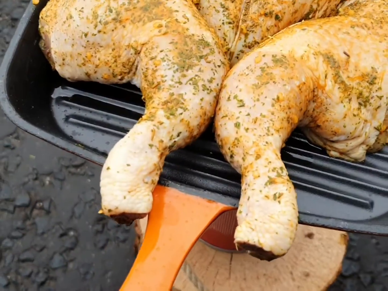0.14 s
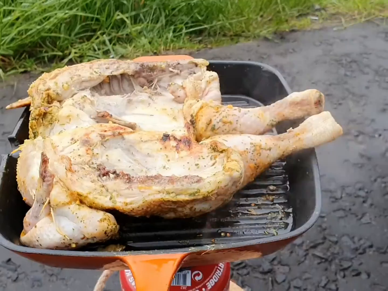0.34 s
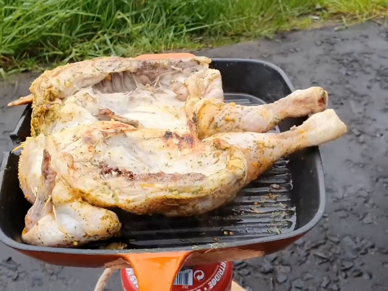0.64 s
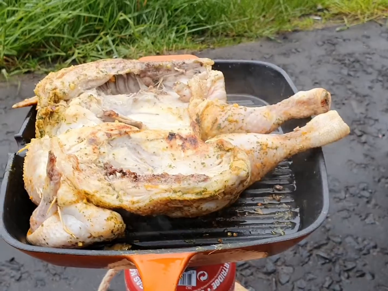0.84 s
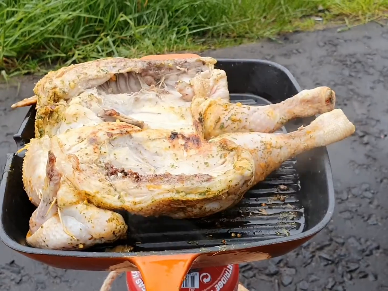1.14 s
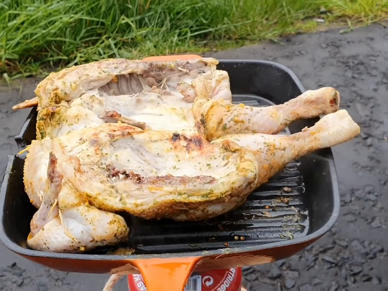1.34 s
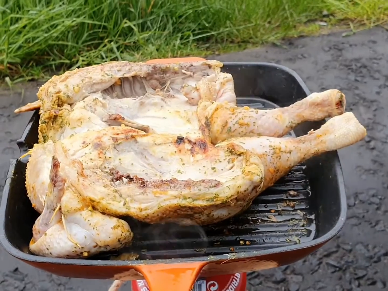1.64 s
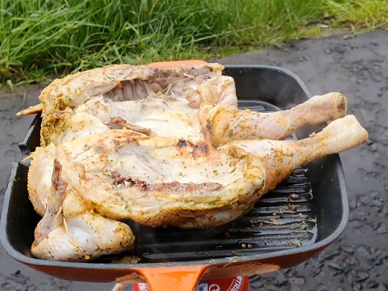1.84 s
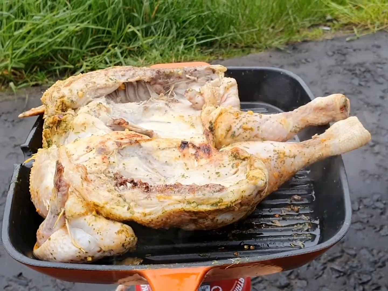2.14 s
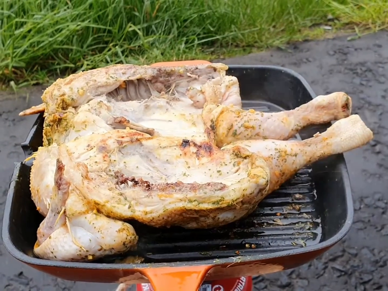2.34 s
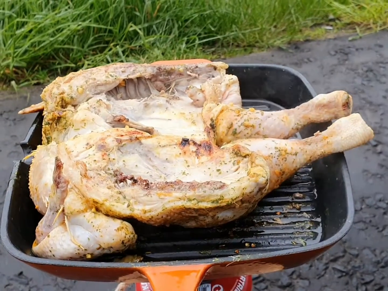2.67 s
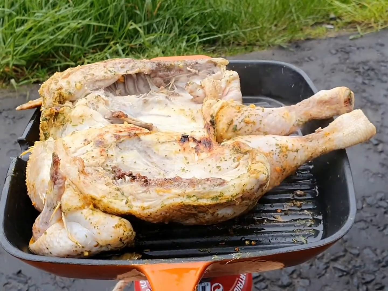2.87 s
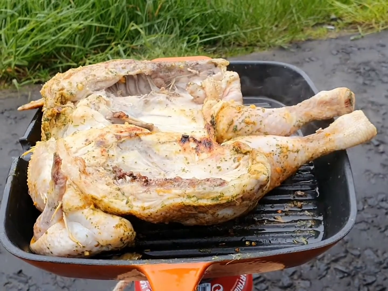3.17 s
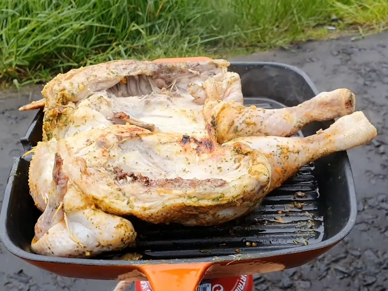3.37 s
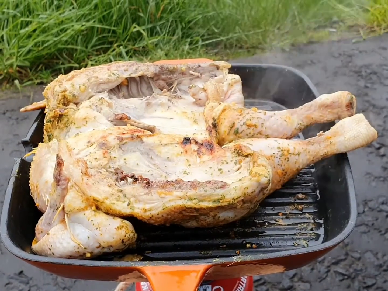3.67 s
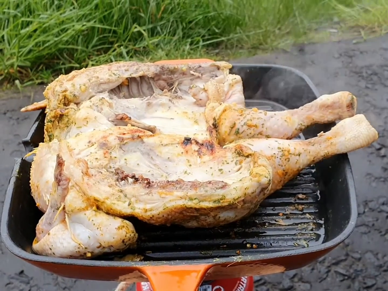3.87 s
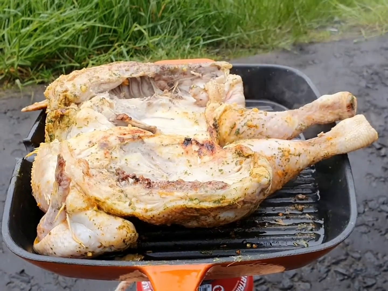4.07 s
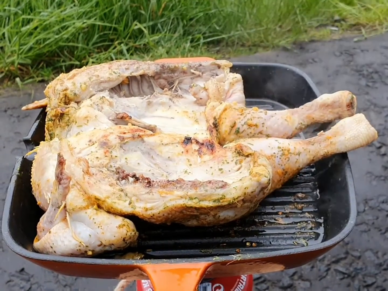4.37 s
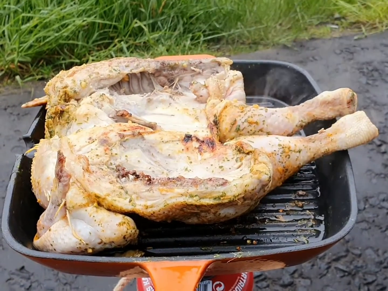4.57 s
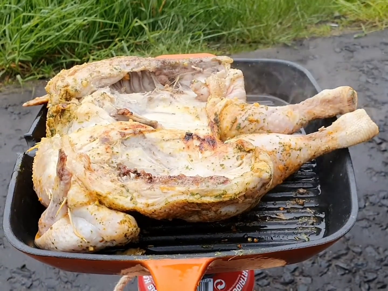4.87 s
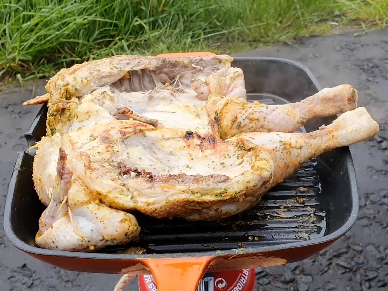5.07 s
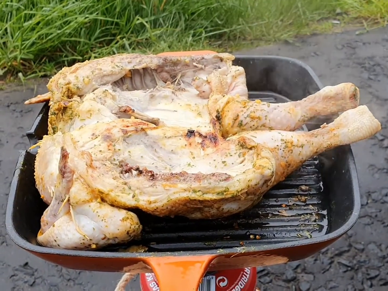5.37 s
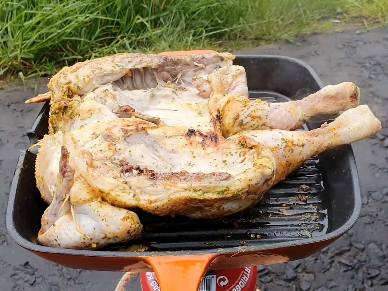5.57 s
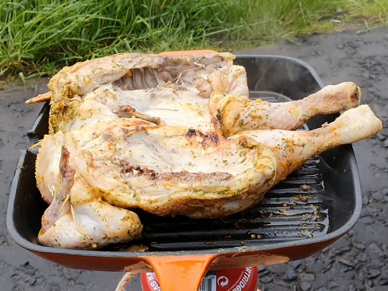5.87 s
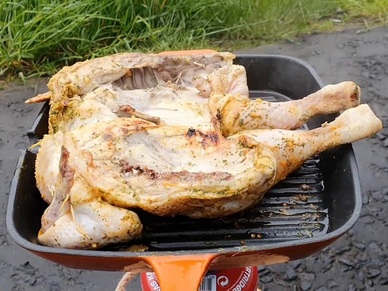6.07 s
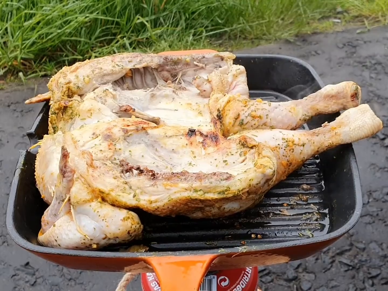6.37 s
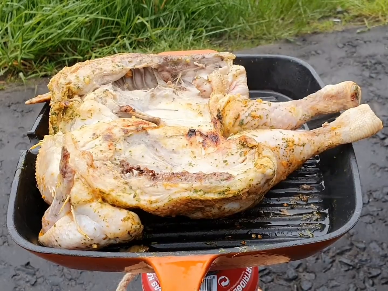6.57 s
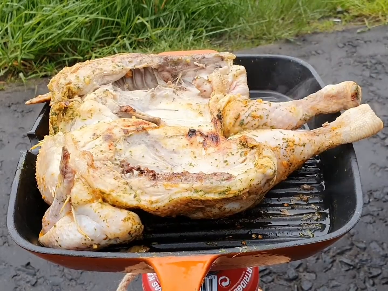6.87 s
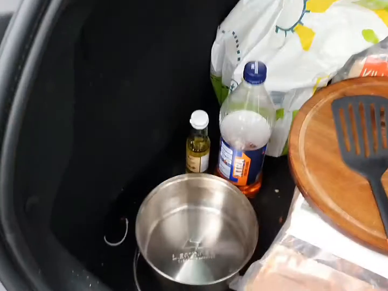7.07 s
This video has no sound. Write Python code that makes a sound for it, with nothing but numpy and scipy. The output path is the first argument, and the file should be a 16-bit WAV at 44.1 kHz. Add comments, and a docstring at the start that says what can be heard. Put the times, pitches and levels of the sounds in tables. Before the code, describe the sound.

Chicken sizzles on a ridged iron pan outdoors, with hissing fat, crackle and sharp loud spits over a low, slowly rising engine drone.

```python
"""Hiss, crackle and loud spits come first: a chicken fries in fat and juice on a ridged iron pan over a camping stove.
Outdoors, a two-port microphone hears it from beside, above and close to the pan, with short silences between.
Band-passed noise makes hiss and bursts; decaying sines make ringing bubbles; the pan colours them all.
From beside, low noise buffets mainly the left port; from above, a far engine's tone slowly rises over rumble."""
import sys
import numpy as np
from scipy import signal
from scipy.fft import rfft, irfft, next_fast_len
from scipy.io import wavfile
from scipy.ndimage import uniform_filter1d, map_coordinates

SR = 44100
rng = np.random.default_rng(int(sys.argv[2]) if len(sys.argv) > 2 else 0)


def master(y):
    """Save y as 16-bit WAV."""
    cut = np.clip(np.atleast_2d(y).T, -1, 1)
    pcm = np.round(cut * 32767)  # scale
    wavfile.write(sys.argv[1], SR, pcm.astype(np.int16))


N = 318519  # samples, about 7.2 s


def amp(db):
    """Decibels become an amplitude factor."""
    return 10 ** (np.asarray(db) / 20)


def unit(x):
    """Scale the whole signal to an RMS of 1."""
    return x / np.sqrt(np.mean(x ** 2) + 1e-20)


def along(points, hz):
    """Columns of (Hz, value, ..) points, interpolated on a log frequency axis."""
    f, *columns = np.transpose(points)
    return np.array([np.interp(np.log(hz + 1), np.log(f + 1), c) for c in columns])


def curves(rows):
    """One value per sample for each column after the time."""
    seconds, *columns = np.transpose(rows)
    return [np.interp(np.arange(N) / SR, seconds, c) for c in columns]


def wobble(rate):
    """A smooth random curve, rate knots a second."""
    knots = rng.standard_normal(int(N * rate / SR) + 4)
    return map_coordinates(knots, [np.arange(N) * rate / SR])


def filtered(x, response):
    """Multiply the spectrum of x by a complex response of frequency."""
    m = 2 * next_fast_len(N // 2 + 4096)  # room for the decay after the end
    return irfft(rfft(x, m) * response(np.fft.rfftfreq(m, 1 / SR)), m)[..., :N]


def causal(gain):
    """The minimum-phase response with this gain, scaled to a mean power of 1."""
    cepstrum = irfft(np.log(gain / np.sqrt(np.mean(gain ** 2))))
    half = cepstrum.shape[-1] // 2
    # folding the cepstrum forward in time makes the response causal
    cepstrum[..., 1:half] *= 2
    cepstrum[..., half + 1:] = 0
    return np.exp(rfft(cepstrum))


# How alike the two microphone ports hear the sound.
# Each row: frequency in Hz, left-right likeness from 0 to 1.
PORT_LIKENESS = [(130, .99), (300, .96), (640, .9), (900, .55), (1150, .88), (1700, .75), (2400, .5),
                 (2900, .15), (4000, .45), (5800, .1), (6500, .35), (8000, .08), (15000, .13)]
# The phase between the ports.
# Each row: frequency in Hz, lead of the left port in radians.
LEFT_LEAD = [(300, 0), (1000, .3), (1300, 1.3), (1900, 1.1), (2500, 2.2), (3400, 3.5), (4000, 6.3),
             (5200, 9)]


def ports(pair):
    """Two source signals become left and right: alike in the bass, shifted in phase."""
    def mix(hz):
        turn = np.arccos(np.clip(along(PORT_LIKENESS, hz)[0], 0, 1)) / 2
        return np.array([np.cos(turn), np.sin(turn)])

    def lead(hz):
        return np.exp(.5j * along(LEFT_LEAD, hz) * [[1], [-1]])

    mid, side = filtered(pair, mix)
    return filtered(np.array([mid + side, mid - side]), lead)


# Spectrum of the rumble of the open air.
# Each row: frequency in Hz, relative level in dB.
AIR_SPECTRUM = [(20, -30), (40, -8), (60, 0), (110, -3), (150, -7), (190, -3.5), (300, -8), (420, -14.5),
                (540, -4.5), (1000, -21)]
# Slow course of the rumble, around which it wavers.
# Each row: time in seconds, level in dB.
RUMBLE_LEVEL = [(.4, -46.5), (2, -48), (4, -45.5), (5.5, -45.5), (7.1, -44)]


def rumble():
    """The open air all around the microphone: low noise whose level wavers."""
    noise = rng.standard_normal((2, N))
    low = unit(ports(filtered(noise, lambda hz: amp(along(AIR_SPECTRUM, hz)))))
    return amp(curves(RUMBLE_LEVEL)[0] + 1.3 * wobble(4.02)) * low


# Course of the far engine's pitch, before its slight unsteadiness.
# Each row: time in seconds, frequency in Hz.
ENGINE_PITCH = [(.42, 78.5), (1.35, 79.3), (2.1, 82.4), (2.9, 84.8), (3.1, 86.3), (4.2, 89.3), (5, 90),
                (5.6, 92), (7.09, 93.7)]
# The tone swells and fades, before its waver and small port difference.
# Each row: time in seconds, RMS level in dB.
ENGINE_LEVEL = [(0.42, -54), (0.51, -45), (1.12, -43.5), (1.26, -48), (1.51, -43), (1.74, -54),
                (1.91, -45.5), (2.05, -50), (2.16, -39.5), (2.7, -46), (2.76, -56), (2.91, -51),
                (2.97, -62), (3.07, -44), (3.39, -45.5), (3.5, -39.5), (3.65, -46), (3.97, -39.5),
                (4.1, -46), (4.19, -41), (4.26, -57), (4.32, -46), (4.71, -41), (4.88, -44.5), (5.69, -41),
                (5.84, -46), (6.33, -41), (6.48, -48.5), (7.05, -39.5), (7.09, -42)]


def drone():
    """A far engine: a slightly unsteady low sine and its wavering octave."""
    (hz,), (db,) = curves(ENGINE_PITCH), curves(ENGINE_LEVEL)
    phase = 2 * np.pi * np.cumsum(hz + 0.52 * wobble(8.7)) / SR
    fundamental = amp(0.54 * wobble(8.1)) * np.sin(phase)
    octave = amp(-16.0) * wobble(22) * np.sin(2 * phase)
    tone = np.sqrt(2) * amp(db) * (fundamental + octave)
    return tone * amp([[-.3], [.3]])  # left, right dB


# Strength of the wind at the microphone, before each port's own gain.
# Each row: time in seconds, level in dB.
GUST_LEVEL = [(0.12, -55), (0.136, -45), (0.178, -52), (0.21, -34), (0.258, -26.5), (0.31, -53),
              (0.34, -43)]


def gust():
    """Wind buffets the left port with low noise, less and differently the right."""
    t = np.arange(N) / SR
    spectrum = [(15, -14), (50, 2.5), (200, 0.5), (500, -22.0), (900, -80)]  # (Hz, dB)
    push = unit(filtered(rng.standard_normal((2, N)), lambda hz: amp(along(spectrum, hz))))
    blowing = (t > GUST_LEVEL[0][0]) * (t < GUST_LEVEL[-1][0])
    return amp(curves(GUST_LEVEL)[0]) * blowing * push * amp([[5], [-14]])  # left, right dB


def overlaid(start_samples, grains):
    """Add each row of grains into one track at its start sample."""
    at = start_samples.astype(int)[:, None] + np.arange(grains.shape[1])
    return np.bincount(at.ravel(), grains.ravel(), N + SR)[:N]


def bubbles(draw, low_hz, high_hz, cycles):
    """Single bubbles ring a few cycles, each from its own pitch and gliding upward."""
    t = np.arange(400) / SR
    hz = low_hz * (high_hz / low_hz) ** draw[:, 1:2]
    force_db = -5 * np.log(draw[:, 2:] + 0.018)  # few are loud
    fall_db = -9 * t * hz / cycles
    ring = amp(force_db + fall_db) * np.sin(2 * np.pi * hz * t * (1 + 0.013 * t * hz))
    return unit(overlaid(draw[:, 0] * N, ring))


def bursts(seconds, gains, t60, tail_db=-20, tail=15.0):
    """Envelope of sudden bursts that die away fast, then linger faintly, tail times slower."""
    t = np.arange(2400) / SR
    fall_db = -60 * t / t60[:, None]
    power = (gains[:, None] * amp(fall_db)) ** 2
    power += (gains[:, None] * amp(tail_db + fall_db / tail)) ** 2
    return np.sqrt(overlaid(seconds * SR, power))


RING_CYCLES = 12.9  # cycles in which a spit's main bubble falls by 60 dB


def rings(spits):
    """The main bubble of each spit rings at its own pitch as a decaying sine."""
    t = np.arange(600) / SR
    seconds, db, *_, hz, ring_db = spits.T[..., None]
    ring = amp(db + ring_db - 60 * t * hz / RING_CYCLES) * np.sin(2 * np.pi * hz * t)
    return overlaid(seconds[:, 0] * SR, ring)


# Course of the frying, before the pan's colour.
# Each row: time in seconds, level in dB, brightness in dB per step of bubble size (later limited).
FRYING_COURSE = [(.01, -40, -2), (.27, -36.5, -0.5), (.36, -40, -3), (.42, -38, .5), (.72, -37.5, -0.5),
                 (1.1, -36.5, 0.5), (1.35, -36.5, 1), (1.5, -36.5, -0.5), (1.85, -37.5, -0.5),
                 (2.25, -38.5, -1), (2.52, -36, -1.5), (2.7, -37.5, -.5), (3.1, -37, 0), (3.6, -37.5, -1),
                 (3.8, -34.5, 0), (3.95, -38, -0.5), (4.9, -37.5, .5), (5.05, -33.5, 0.5), (5.18, -39, 1),
                 (5.65, -37, 0), (5.85, -38, 0), (6.5, -38.5, -0.5), (7.0, -37.5, 0.5), (7.1, -41, 1.5),
                 (7.15, -47, 0)]
# Loud single spits in the fat, before the pan's colour.
# Each row: start in seconds, level in dB, strongest frequency in Hz, loss in dB per octave away,
# left-right difference in dB, main bubble in Hz, level of that bubble over the spit in dB.
SPIT_EVENTS = [(0.0454, -19, 1990, 7, -0.5, 660, -7.5), (0.0503, -10.5, 1910, 5.5, 0, 1860, -9.5),
               (0.0554, -16.5, 3300.0, 4, -5, 3320, 2), (0.0648, -17, 3300.0, 15, 0.0, 3400, -6),
               (0.0968, -23, 3800.0, 3, 2, 3870.0, -6), (0.1769, -21, 1210, 2, -1, 656, -3.5),
               (0.2062, -24, 2000.0, 11, -2, 1860, -6), (0.5033, -24, 8100.0, 2.5, 5, 6240.0, -4),
               (0.6347, -30, 3800.0, 3, 1, 2360.0, -5), (0.9925, -23.5, 3300.0, 5.5, -2, 4510.0, -5),
               (1.0139, -24.5, 1300.0, 5, -2.0, 1240, -6), (1.0368, -25, 10900.0, 6, -4, 4250.0, -9),
               (1.0424, -23, 2800.0, 3, 2, 4100, -6), (1.0874, -16.5, 4500.0, 2, 3, 3560, 0),
               (1.0966, -19, 4500.0, 2, -3, 3850.0, -1), (1.1636, -9.5, 1100.0, 4, -0.5, 1100, -3),
               (1.1717, -17.5, 1100.0, 11, -2, 1140, -3.5), (1.4373, -20, 2800.0, 4, 2, 2370, -5),
               (1.4816, -30, 10900.0, 3, 5.0, 4170.0, -9), (1.5788, -21, 1300.0, 7, 0, 4250.0, -13),
               (1.6295, -24, 1600.0, 5, -5, 2230, -2), (1.6742, -29, 12000.0, 2, 1.0, 3460.0, -6),
               (1.7063, -24, 4100.0, 13, 8.5, 4070, 6), (2.0459, -14.5, 1400.0, 8, -1.0, 3180.0, -3),
               (2.2877, -24.5, 1500.0, 8, 1, 1810.0, -3), (2.2976, -25.0, 2800.0, 6, -1, 2170.0, -5),
               (2.4435, -23.5, 1200.0, 2.5, -1, 3520, 5), (2.6006, -13.5, 9900.0, 10, 2, 6230.0, -1),
               (2.699, -28.5, 1400.0, 7, -1.0, 2110.0, -5), (2.8572, -26.5, 6000.0, 8, 8, 5800, 2),
               (2.9984, -22, 7300.0, 3, -1, 4200.0, -4), (3.1351, -14, 1100.0, 5.5, 2, 3850.0, -10),
               (3.1451, -10.5, 1900.0, 4, 0.0, 1800, -1.5), (3.334, -28.5, 12000.0, 10, 4, 1420.0, -11),
               (3.4768, -20.5, 4500.0, 1, -4, 3710.0, -2), (3.5312, -25.5, 3800.0, 3, 0, 3920.0, -7),
               (3.6083, -22.5, 1300.0, 8, -1.0, 1440.0, -3.5), (3.6739, -22.5, 12000.0, 6, -6, 4600.0, -7),
               (3.6776, -29, 1500.0, 4, -2.0, 1530.0, -3), (3.7402, -16.0, 1810, 10, -1, 2050, -6),
               (3.7824, -26.0, 2600.0, 4, 5, 3590.0, -6), (3.8071, -21, 2400.0, 8, -2.0, 3560.0, -7),
               (3.812, -26, 3000.0, 6, -3, 2050.0, -6), (4.017, -22, 12000.0, 13, -2, 3260.0, -14),
               (4.0642, -18, 1300.0, 11, -1, 2020.0, -13), (4.2465, -16, 4140, 4, 2, 4130.0, 2),
               (4.296, -27, 7300.0, 5, -4, 4440.0, -6), (4.4498, -18, 12000.0, 7, -2, 4220.0, -13),
               (4.5762, -26.5, 12000.0, 2, 0, 3460.0, -4), (4.6614, -25.5, 1100.0, 2, 0, 1430.0, -7),
               (4.6663, -22.5, 1100.0, 3, -1.0, 1160.0, -5), (4.802, -23.5, 8100.0, 6, -5, 4540.0, -7),
               (4.8183, -23.5, 1100.0, 1.5, 0, 1500.0, -2), (4.8541, -20.5, 12000.0, 9, 1.5, 6370.0, -7),
               (4.9108, -19.5, 4100.0, 7, 2.0, 4190.0, 7), (4.9234, -25, 1500.0, 5, -2.0, 1660, -5),
               (4.9753, -23.0, 1100.0, 4, -1.0, 1200.0, -7), (5.0309, -25, 12000.0, 3, 0.0, 4150.0, -6),
               (5.039, -23, 5000.0, 5, -3, 4130, 3), (5.0452, -22.5, 2600.0, 6, 0.0, 2120.0, -5),
               (5.0597, -25.0, 1100.0, 0, -5, 3170.0, -5), (5.2686, -22, 1500.0, 2.5, 2, 4300, -2),
               (5.302, -22, 12000.0, 5, 3.5, 6560.0, -3), (5.375, -23, 12000.0, 10, -2.0, 5040.0, -6),
               (5.4967, -25, 8900.0, 3, -3, 1835, -3), (5.5271, -25.5, 3500.0, 1, 0, 3350.0, -3),
               (5.5328, -21.5, 1400.0, 10, -1, 1564, -1), (5.6689, -21.5, 5500.0, 9, 5.0, 3680, -7),
               (5.6744, -26, 7300.0, 4, 4, 4320.0, -5), (5.6785, -24.5, 1700.0, 1, -1, 1700, -6),
               (5.6894, -21.5, 2800.0, 4, 1, 2120.0, -7), (5.6935, -22, 9900.0, 5, 1, 4570.0, -7),
               (5.7298, -31, 2400.0, 4, -4, 2130.0, -3), (5.8528, -19.5, 1690, 5, 1, 3690.0, -3),
               (5.8882, -24.5, 8100.0, 6, 1, 4570.0, -8), (5.9434, -20, 1100.0, 6, 2, 1230, -6.5),
               (5.9903, -21, 8100.0, 11, 3.0, 6400, -2), (6.017, -24.5, 1100.0, 4, 2, 3240.0, -8),
               (6.135, -24, 1100.0, 2, -1, 3340.0, -8), (6.1423, -25, 12000.0, 4, 3.0, 4610.0, -7),
               (6.1851, -23, 8900.0, 11, 5, 6810, -6), (6.2676, -30, 4500.0, 3, 2.0, 3270.0, -1),
               (6.4447, -25.5, 4500.0, 14, -2, 4320.0, 8), (6.6523, -23, 1100.0, 2.5, 3, 1490.0, -8),
               (6.7751, -18, 7300.0, 6, 0.0, 5870.0, -3), (6.8001, -27.0, 10900.0, 3, -2, 3420.0, -7),
               (6.9719, -21.5, 1400.0, 4.5, 2, 1550, -2.5)]
# The four sizes of steam bubble, from large to small.
# Each row: low edge in Hz, high edge in Hz, typical frequency in Hz, relative length of a burst,
# spit gain in dB, crackle gain in dB.
BUBBLE_SIZES = [(138, 1390, 940, 1.07, 1.5, -0.7), (1370, 2910, 1950, 1.56, 1.5, -0.7),
                (3160, 7500, 4250, 0.71, 7, 3.6), (7650, 21000, 10000, 0.75, 6.5, 4)]
SPIT_T60_S = 0.011  # before the relative length of each size


def frying(spread_db=3.0, hiss_db=-2, crackle_db=-4, fizz_db=-12, snap_db=14):
    """Steam bubbles of four sizes burst in the fat: a hiss, a fizz, clumped crackle and loud spits."""
    t = np.arange(N) / SR
    level_db, bright_db = curves(FRYING_COURSE)
    bright_db = np.clip(bright_db, -2.5, 2)
    draw = rng.random((3000, 7))  # one row per crackle burst
    busy = np.cumsum(amp(2.5 * wobble(14)))  # crackle comes in clumps
    when = np.interp(draw[:, 0], busy / busy[-1], t)
    force_db = -spread_db * np.log(draw[:, 1] + .04)
    spits, total = np.array(SPIT_EVENTS), 0
    start, spit_level_db, peak_hz, loss_db, side_db = spits.T[:5]
    seethe = wobble(25)  # shared by all sizes
    # a spit nearer one port is louder there
    spit_pan = amp(np.interp(t, start, side_db) * [[.5], [-.5]])

    for k, (low_hz, high_hz, mid_hz, length, spit_db, gain_db) in enumerate(BUBBLE_SIZES):
        share_db = 16 * (draw[:, 3 + k] - 1)  # each burst favours some sizes
        crackle_gains = amp(force_db + share_db + crackle_db + gain_db + 10)
        crackle = bursts(when, crackle_gains, length * 0.0084 * (.5 + draw[:, 2]))
        hiss = amp(hiss_db + .8 * seethe + 1.2 * wobble(30))
        bed = amp(level_db + bright_db * (k - 1.5)) * np.sqrt(hiss ** 2 + crackle ** 2)
        band = signal.butter(2, [low_hz, high_hz], "band", fs=SR, output="sos")
        total += ports(signal.sosfilt(band, bed * rng.standard_normal((2, N))))

        away_db = np.abs(loss_db * np.log2(mid_hz / peak_hz))
        gains = amp(spit_level_db - away_db + spit_db)
        envelope = bursts(start, gains, np.full(len(spits), length * SPIT_T60_S))
        spit = envelope * rng.standard_normal((2, N))
        spit[0, (start * SR).astype(int) + 8] += amp(snap_db) * gains  # the bubble wall snaps
        band = signal.butter(2, [max(low_hz, 560), high_hz], "band", fs=SR, output="sos")
        total += ports(signal.sosfilt(band, spit)) * spit_pan

    total += ports(rings(spits) * [[1], [0]]) * spit_pan
    fizz = np.array([bubbles(rng.random((8000, 3)), low_hz=2170, high_hz=14700, cycles=3.0)
                     for _ in range(2)])
    return total + amp(level_db + fizz_db) * ports(fizz)


def colour(spectrum, hollows):
    """The broad spectrum lifted at each ringing hollow; both ports share one causal phase."""
    def response(hz):
        lift = 1 + sum(amp(db) / (1 + (2 * (hz - centre) / width) ** 2) for centre, width, db in hollows)
        gains = amp(along(spectrum, hz)) * lift
        shared = np.sqrt(gains[0] * gains[1])
        return causal(shared) * gains / shared
    return response


# Broad colour of pan and ports from beside, above and close to the pan, before the hollows' lift.
# Each row: frequency in Hz, relative left level in dB, relative right level in dB.
BESIDE_SPECTRUM = [(60, -6, 8), (200, -1.5, -0.5), (397, -1.5, -2.5), (640, -4, -2), (1220, -9, -14.5),
                   (1950, -6.5, 2.5), (2570, -21, -19), (3300, -6, -3.5), (4550, -8, -12),
                   (6200, -8.5, -16), (7300, -18.5, -30), (8900, -12.5, -29), (13000, -11, -15),
                   (15300, -12, -11)]
ABOVE_SPECTRUM = [(380, -22.5, -26), (564, -16, -15.5), (944, -17, -19), (1133, -8, -7.5), (1720, -7, -7),
                  (2750, -9, -8), (3260, -2, -21.5), (4530, -8, -8), (5170, -9, -15), (6550, -6.5, -16),
                  (7420, -21.5, -36), (8480, -14.5, -27), (10070, -14, -13.5), (13100, -8, -19),
                  (15800, -19.5, -14.5)]
CLOSE_SPECTRUM = [(79.8, -13, 7), (199, -8, -10), (351, 1, -3), (700, -1, -3), (1200, -7, -7),
                  (2010, -8, -2.5), (3260, -5, -8), (4500, -9, -12), (6040, -13, -32), (7550, -23, -36),
                  (9000, -22, -35), (13200, -19, -31), (15300, -23, -32)]
# Hollows between the pan's ridges that ring from beside and from above.
# Each row: centre in Hz, width in Hz, strength in dB of the added gain.
BESIDE_HOLLOWS = [(658, 33, 0), (1800, 71, -4), (2467, 150, 18)]
ABOVE_HOLLOWS = [(548, 28, -9), (651, 22, -4.5), (1175, 36, 0.1), (2025, 37, -3.5), (4184, 68, -4)]
# When the microphone listens from beside, above and close to the pan.
# Each row: start in seconds, end in seconds.
LISTENING_TIMES = [(0, .3665), (.4132, 7.1), (7.1372, 7.3)]


def scene():
    """Each angle colours the pan its own way; wind is heard from beside, engine and rumble from above."""
    t = np.arange(N) / SR
    fry = frying()
    beside = filtered(fry, colour(BESIDE_SPECTRUM, BESIDE_HOLLOWS)) + gust()
    above = amp(0.18) * filtered(fry, colour(ABOVE_SPECTRUM, ABOVE_HOLLOWS)) + drone() + rumble()
    close = amp(8.0) * filtered(fry, colour(CLOSE_SPECTRUM, []))
    total = 0
    for (start, end), sound in zip(LISTENING_TIMES, [beside, above, close]):
        gate = uniform_filter1d(1. * (t > start) * (t < end), size=60)  # 60-sample fades
        total = total + gate * sound
    return total


# The right port's duct cancels one band.
# The row: centre in Hz, width in Hz, gain left at the centre.
DUCT_NOTCH = (8150, 1500, .08)
TOP_HZ = 16650  # band limit


def record(dry):
    """The input saturates softly, the right port has a notch, and the top treble falls to a band limit."""
    centre, width, rest = DUCT_NOTCH

    def response(hz):
        top = amp(-36 * np.clip((hz - 15450) / 1000, 0, 2)) * (hz < TOP_HZ)
        off_centre = centre ** 2 - hz ** 2
        notch = (off_centre + 1j * hz * width * rest) / (off_centre + 1j * hz * width)
        return np.array([top, top * notch])

    rounded = dry / (1 + np.abs(dry / .95) ** 6) ** (1 / 6)  # the loudest snaps saturate the input
    return filtered(rounded, response)


dry = scene()
out = record(dry)
master(out)
```